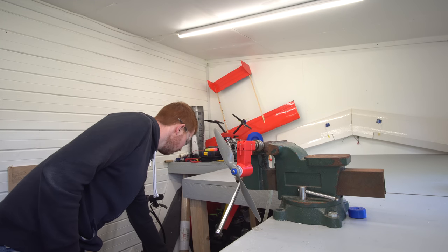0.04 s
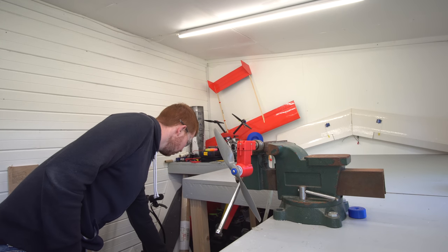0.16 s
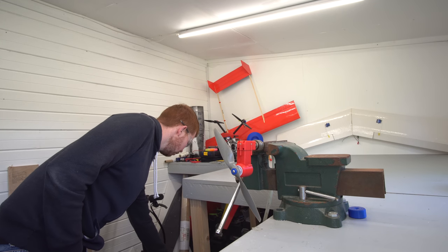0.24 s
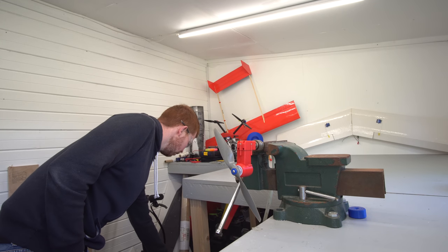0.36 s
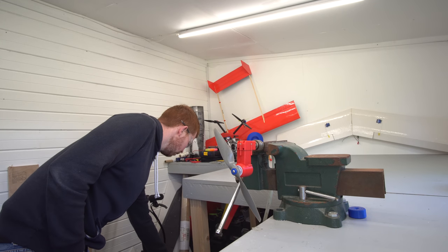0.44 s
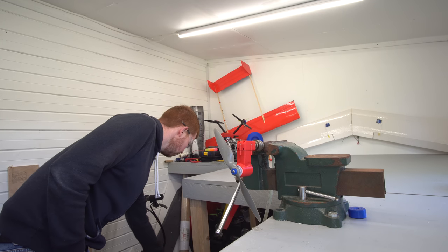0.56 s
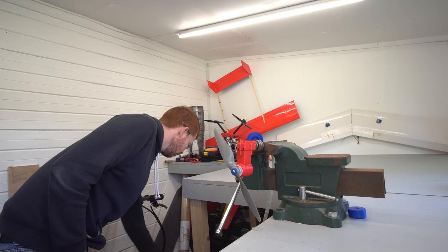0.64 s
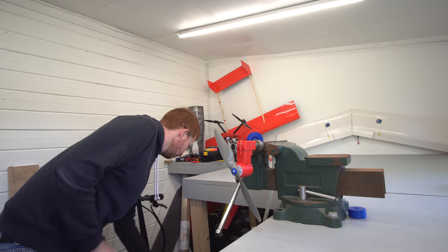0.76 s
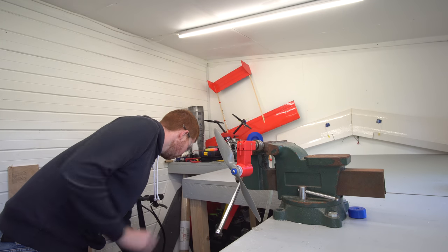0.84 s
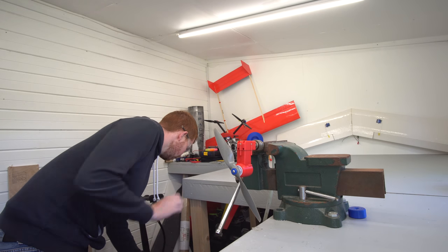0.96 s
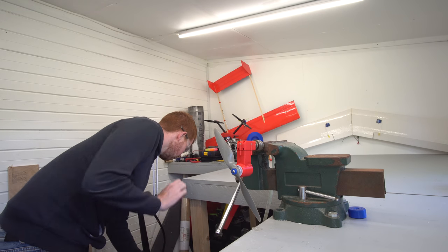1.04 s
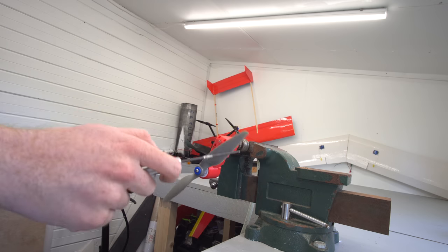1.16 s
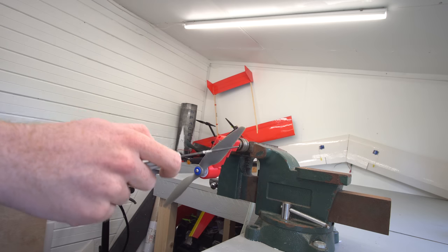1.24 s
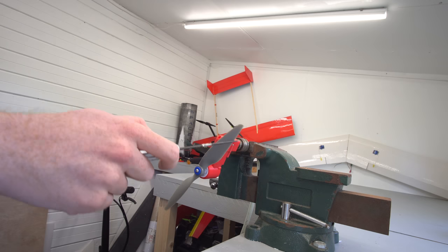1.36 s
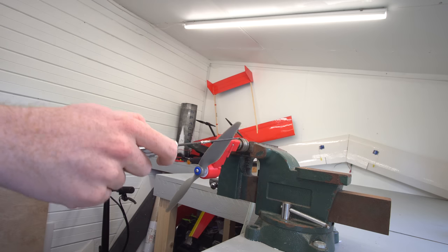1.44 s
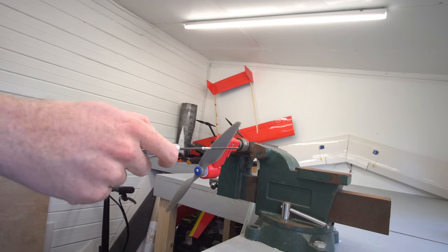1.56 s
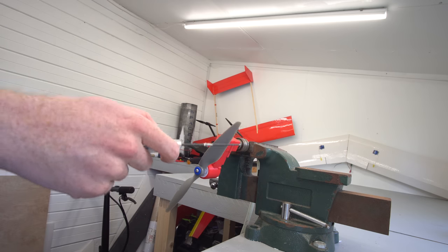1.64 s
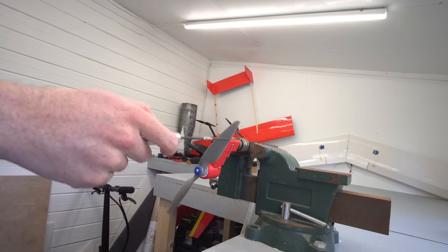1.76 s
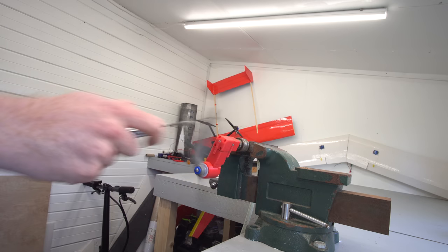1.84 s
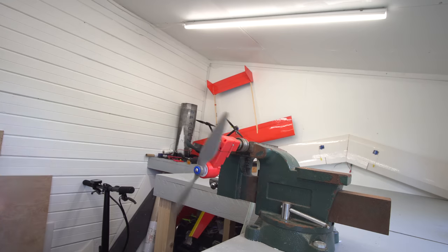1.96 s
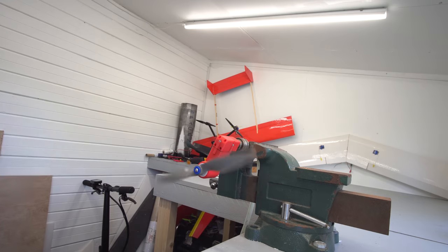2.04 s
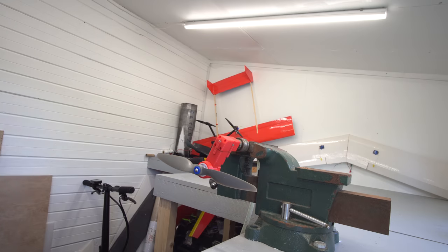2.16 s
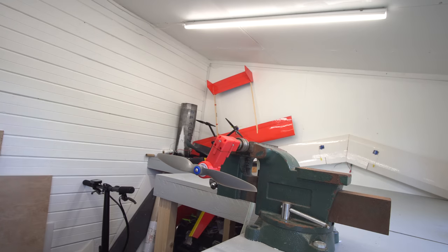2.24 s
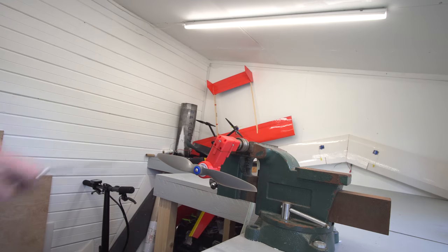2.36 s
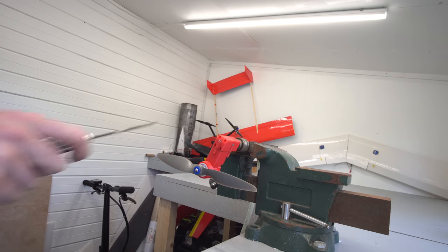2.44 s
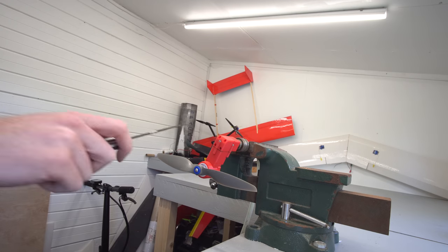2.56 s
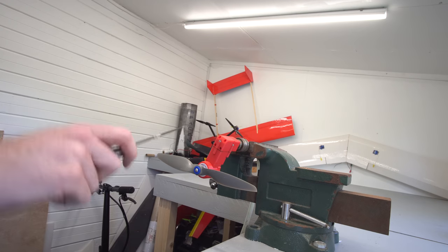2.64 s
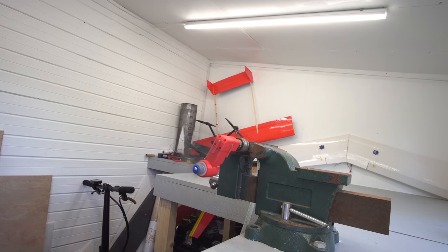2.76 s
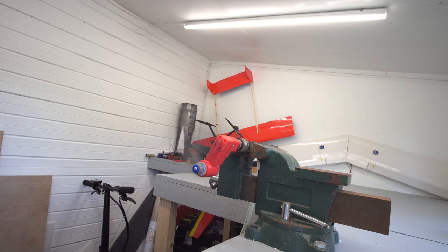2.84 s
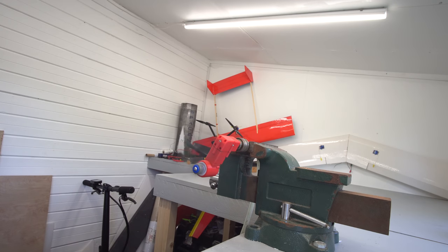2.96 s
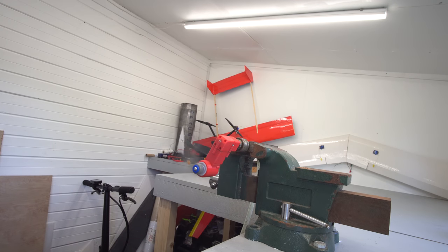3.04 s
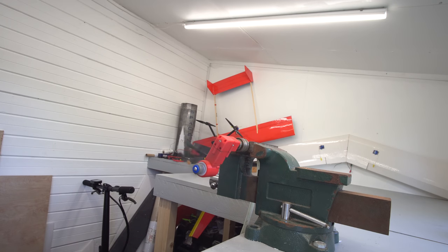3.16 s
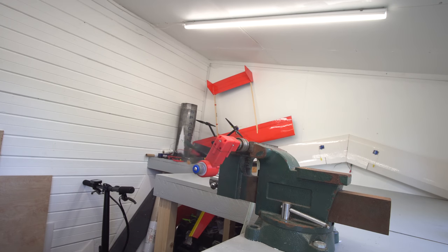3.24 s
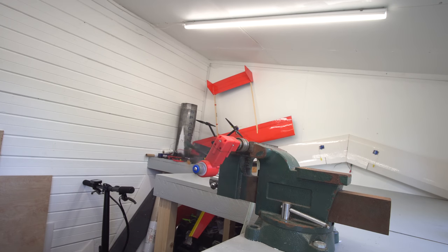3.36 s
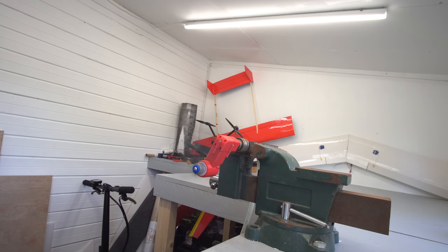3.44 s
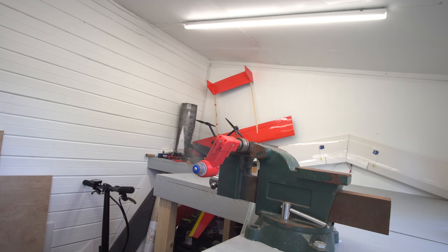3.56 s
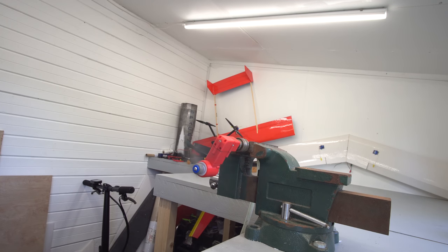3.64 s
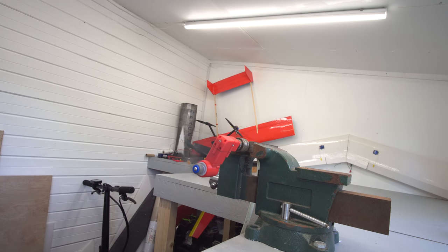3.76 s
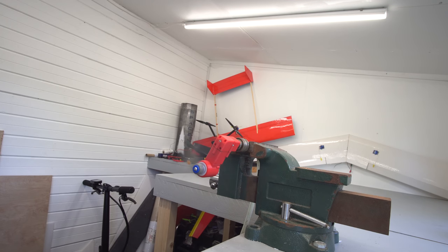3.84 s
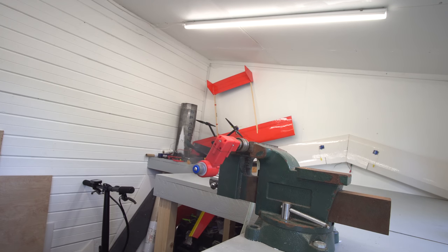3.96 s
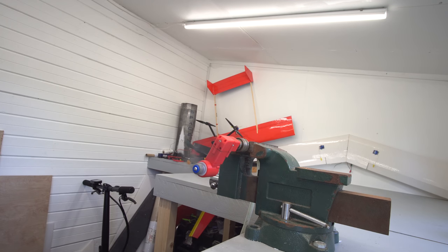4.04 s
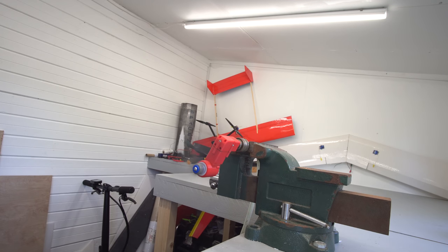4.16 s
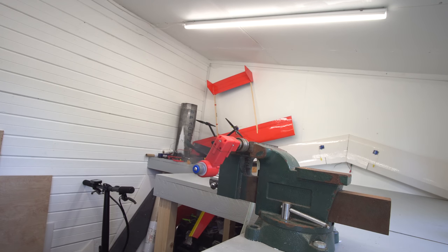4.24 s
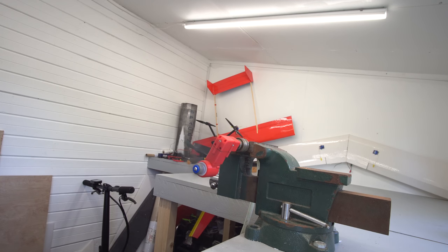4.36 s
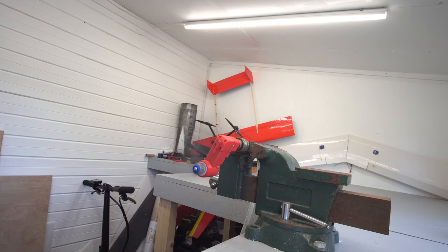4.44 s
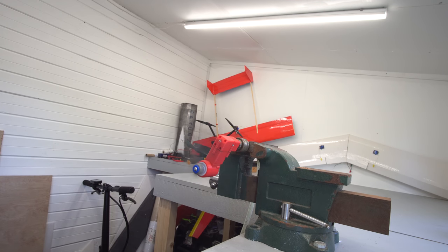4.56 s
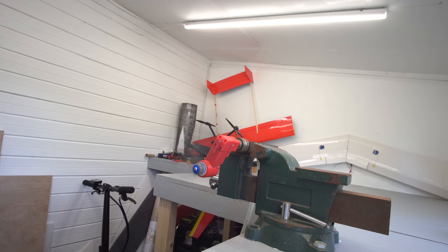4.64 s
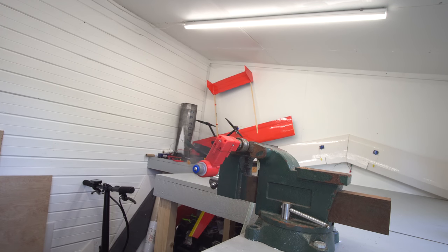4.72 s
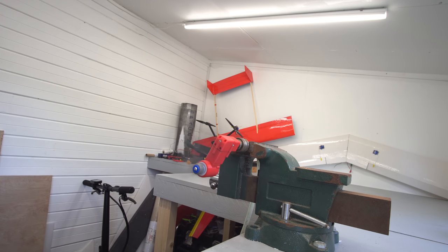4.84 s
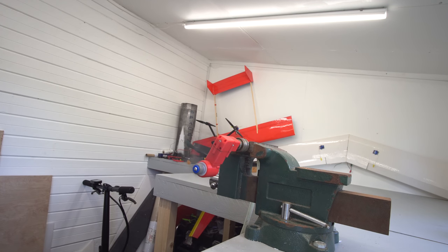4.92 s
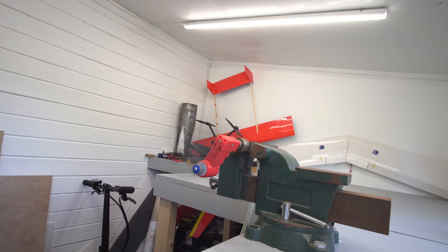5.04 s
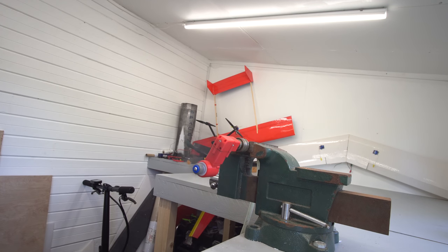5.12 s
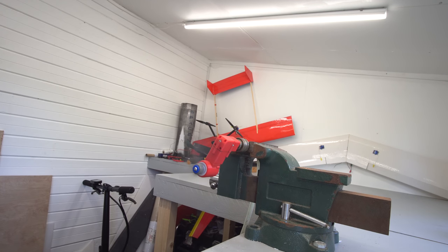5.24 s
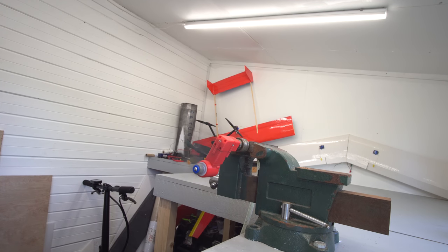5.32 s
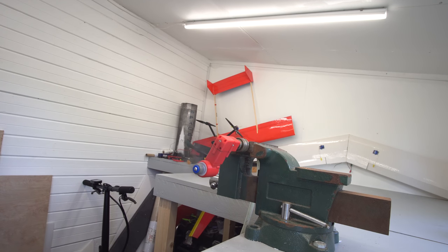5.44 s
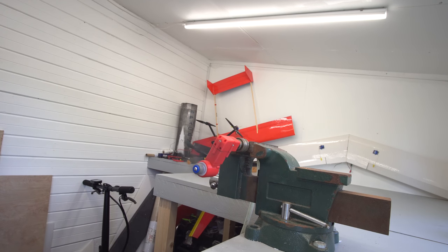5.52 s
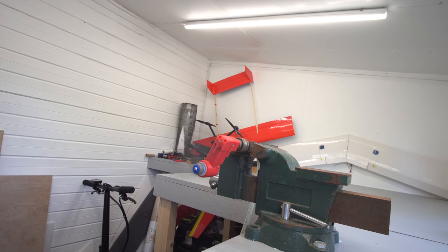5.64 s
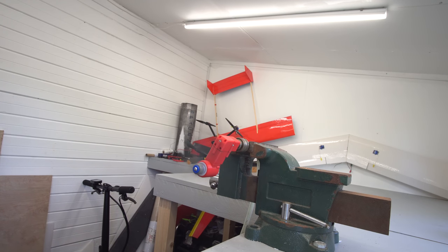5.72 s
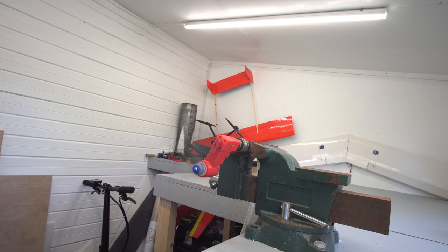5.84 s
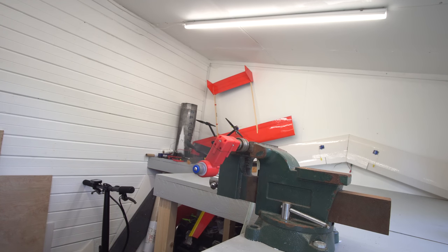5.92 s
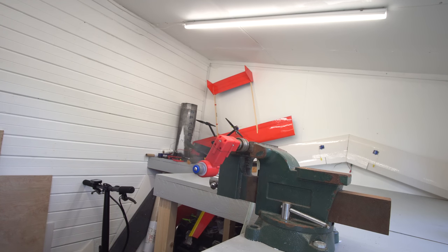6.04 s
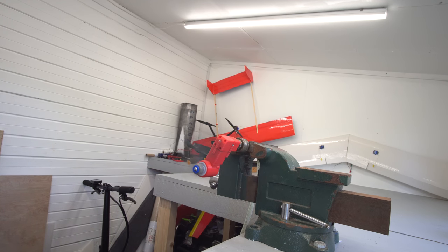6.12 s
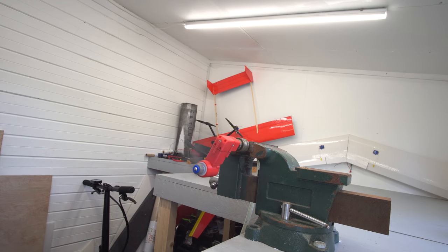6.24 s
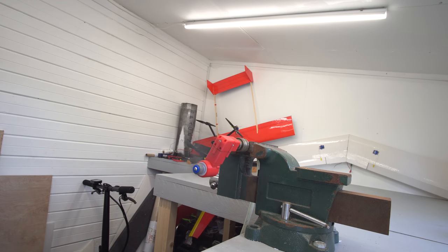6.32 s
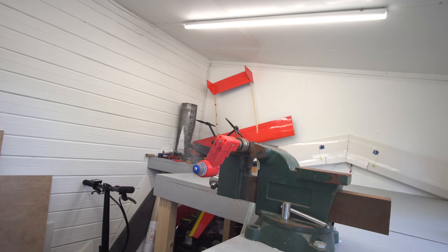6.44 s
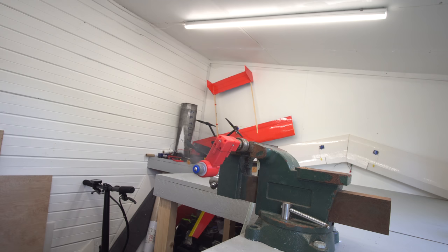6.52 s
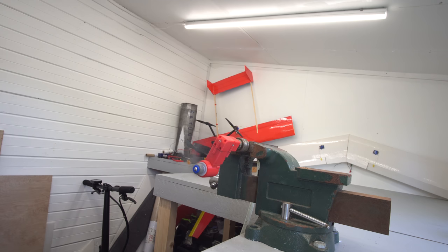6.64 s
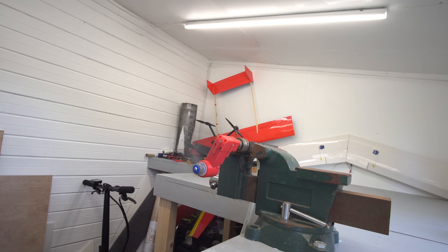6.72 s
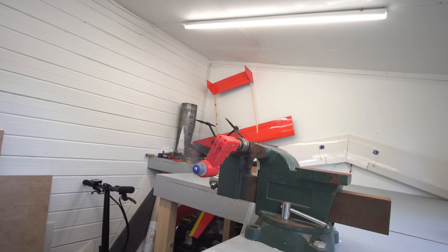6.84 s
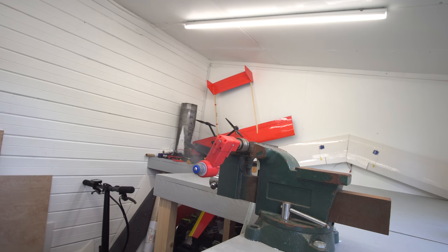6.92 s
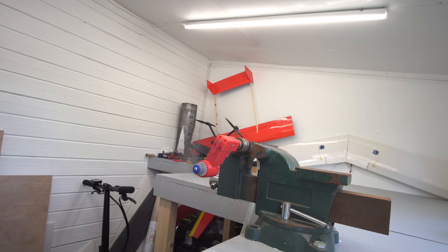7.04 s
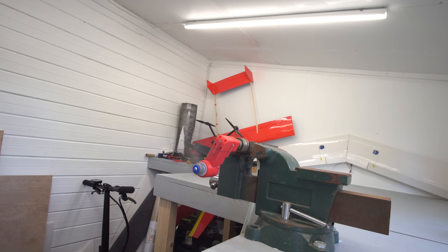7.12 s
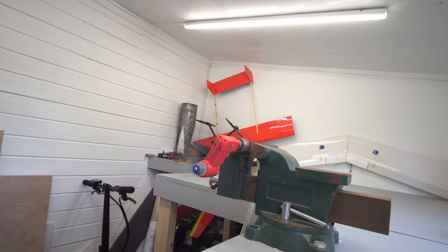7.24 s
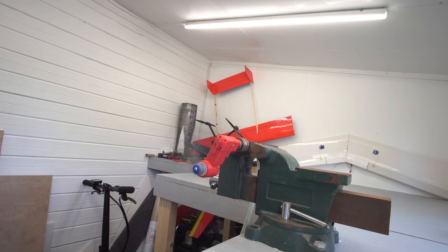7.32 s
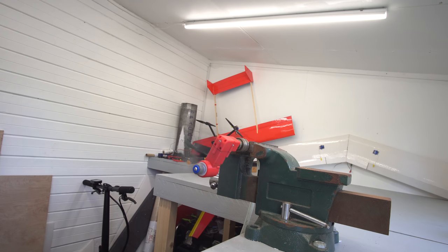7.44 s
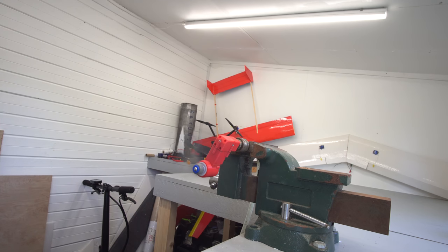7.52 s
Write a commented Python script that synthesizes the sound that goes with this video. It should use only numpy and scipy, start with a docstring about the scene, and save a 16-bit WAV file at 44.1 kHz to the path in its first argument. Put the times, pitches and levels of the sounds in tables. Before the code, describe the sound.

A distant, blurred engine buzz with throbbing hiss ends suddenly. The microphone is now near the engine clamped in a vice: quiet high leaking air, soft touches, a single knock with a puff, leak again, then quick pops as it catches and spins up within a fraction of a second. Rapid hard knocks, low beat and bright pulsing air continue to the end, slowly fading, with short room reflections.

```python
"""A small workshop: a single-cylinder compressed-air engine with a propeller is clamped in a vice.
It runs, heard from across the room; then, from close by, it stands with its valve leaking, is flicked
over for one stroke, and at last starts and runs on while the air pressure slowly falls.
Running sound is periodic in the shaft's angle: harmonics for the pressure pulses, gated noise for the
inlet and exhaust air, damped sines for the knocks. A loose thing clatters during the near run."""
import sys
import numpy as np
from scipy import signal
from scipy.fft import rfft, irfft, next_fast_len
from scipy.io import wavfile

SR = 44100
rng = np.random.default_rng(int(sys.argv[2]) if len(sys.argv) > 2 else 0)


def transcribe(u):
    """Save the signal u as a 16-bit wav file named by the first command-line argument.

    u: samples, shape (n,) or (channels, n), limited to [-1, 1]; the rate is SR.
    q: integer samples, one column per channel.
    """
    v = np.clip(np.atleast_2d(u).T, -1, 1)
    q = np.round(v * 32767).astype(np.int16)
    wavfile.write(sys.argv[1], SR, q)


N = 334278
T = np.arange(N) / SR  # time/s

# In spectra, harmonics and resonances, levels are relative: the sum is scaled to a set power.

# --- near run ---
# full shaft speed, which hunts a little: (t/s, speed/(turns/s))
FULL_SPEED = [(3.59, 42.911), (3.67, 43.707), (4.08, 42.111), (4.36, 43.262), (4.8, 41.955), (5.15, 42.967),
              (5.55, 41.779), (5.65, 42.607), (6.69, 42.705), (7.14, 42.322), (7.58, 42.837)]
# the engine catches at this knock (t/s), short of full speed by a share that dies away (time constant/s)
CATCH_S, SHORTFALL, SPIN_UP_S = 2.8985, .3857, .0774
# the supply holds until t/s, then drains; after DRAIN_S more only the low-pressure beat is left
FULL_UNTIL_S, DRAIN_S = 3.7, 2.6
# levels at full pressure and speed (dB), fall as the supply drains (dB/s), growth with speed (exponent)
BEAT_DB, BEAT_FALL_DB_PER_S, BEAT_GROWTH = -22.5, 1.27, 1
AIR_DB, AIR_FALL_DB_PER_S, AIR_GROWTH = -20.5, 1.23, .95
# the inlet hisses just before the knock (level/dB, lead/turns, width/turns)
INLET_DB, INLET_LEAD, INLET_LENGTH = 6.0, 0.082, 0.056
# the piston chokes the flow at the knock, then spent air spills out and ebbs (level/dB, length/turns)
CHOKE_DB, CHOKE_LENGTH = -3.5, 0.02
SPILL_DB, SPILL_LENGTH = 3.5, 0.087
# pressure pulses of valve, exhaust and return stroke: (angle/turns, signed size)
STROKES = [(-.017, -0.28), (0.228, 0.9), (.58, -.25)]
# harmonics of the beat at full and at lower pressure: (multiple of the shaft speed, level/dB)
FULL_HARMONICS = [(1, -16), (2, 0.5), (3, 1.5), (4, -4.5), (5, -16), (6, -0.5), (7, -6.5), (8, -35),
                  (9, 2.5), (10, -1.5), (11, 1.5), (12, -15), (13, 0.5), (14, 2.5), (15, 1), (16, -5.5),
                  (17, -16), (18, -3), (19, -11), (20, 1.5), (21, -6.5), (22, -29), (23, -12), (24, -53)]
LOWER_HARMONICS = [(1, -32), (2, -6.5), (3, -4.5), (4, -12), (5, -38), (6, -8), (7, -10), (8, -15),
                   (9, -10.5), (10, -8), (11, -9), (12, -7.5), (13, -4), (14, 1), (15, -4.5), (16, -7.5),
                   (17, -13.5), (18, -7), (19, -23), (20, -6.5), (21, -26), (22, -41), (23, -20), (24, -51)]
# hiss of the running engine: (f/Hz, level/dB)
NEAR_AIR = [(530, -16.5), (900, -3.5), (1230, -8.5), (1390, -3), (1720, -3.5), (2600, -6), (3550, -7.5),
            (4740, -7), (6890, -7), (8550, 1), (10200, -12.5), (13500, -6.5), (16000, -21)]
# rush of spent air, which grows with the pressure: (f/Hz, level/dB)
RUSH_AIR = [(100, -56), (400, 8), (900, 0), (1500, -3), (2300, 4.5), (3500, -5), (6000, -2.5), (12000, -8)]
# crack of air through the valve: (f/Hz, level/dB)
CRACK_AIR = [(300, -8), (900, -38), (1800, -34), (2800, -7), (5000, -8), (8400, 7.5), (10300, -6),
             (13500, 5), (16000, -13)]
# modes of the crankcase: (f/Hz, t60/s, level/dB)
CASE_MODES = [(1266, 0.013, -13), (1770, 0.027, -9.5), (1940, 0.0095, -5.5), (2156, 0.014, -10.5),
              (2770, 0.004, -4), (3650, 0.0052, -5)]

# --- single strokes ---
# single knocks of the valve: (t/s, crack level/dB, rise/s, crankcase blow level/dB)
KNOCKS = [(1.9988, -7.5, 0.00077, -14), (2.8096, -19, 0.00091, -10.5)]
# pops of the exhaust and soft thuds of the hand: (t/s, level/dB, f/Hz, Gaussian width/s)
POPS = [(1.982, -13, 425, 0.0016), (1.987, -31, 106, 0.017), (2.108, -36, 247, 0.0015),
        (2.188, -50, 45, .03), (2.866, -9.5, 540, 0.00093), (2.908, -9.5, 545, 0.00093)]
# gusts of air while the shaft turns slowly: (peak t/s, level/dB, rise/s, decay/s)
GUSTS = [(1.971, -21, 0.005, 0.023), (2.012, -16, 0.006, 0.033), (2.811, -19, 0.0012, 0.0055),
         (2.854, -22, 0.0023, 0.014)]
# each gust trails off as the pipe empties (share of its strength, decay/s)
TRAIL_SHARE, TRAIL_S = 0.32, .05
# air of the gusts: (f/Hz, level/dB)
GUST_AIR = [(60, 7), (200, -5), (650, -0.5), (1300, -1.5), (2400, -4.5), (4200, -0.5), (6400, -4),
            (7500, -1.5), (9000, 0.5), (10300, -7.5), (13500, -7), (16000, -15)]
# whistling resonances of the open port: (f/Hz, width/Hz, boost/dB)
PORT_PEAKS = [(710, 140, 5), (2170, 260, 7), (6150, 390, 8), (8840, 460, 7)]

# --- far run ---
# shaft speed (turns/s), start of a turn and end of the run (t/s)
FAR_HZ, FAR_FIRST_S, FAR_END_S = 47.83, .0286, 1.179
# levels at the start (dB) and their fall as the supply drains (dB/s)
FAR_DRONE_DB, FAR_HISS_DB, FAR_FALL_DB_PER_S = -18.5, -19.2, 1.85
# the strokes and their echoes from the walls: (angle/turns, signed size)
FAR_STROKES = [(-.27, 0.89), (-.04, -0.58), (0.199, 1), (0.367, -0.53), (0.549, 0.058)]
# harmonics of the drone: (multiple of the shaft speed, level/dB)
FAR_HARMONICS = [(1, -2.5), (2, -1.5), (3, -3.5), (4, -25.5), (5, -3.5), (6, -10), (7, 2.5), (8, -6.5),
                 (9, 0), (10, -5), (11, -3.5), (12, -1), (13, -25), (14, 1), (15, -3.5), (16, 0.5), (17, 1),
                 (18, -6), (19, -5), (20, -9.5), (21, -5), (22, -19.5), (23, -33), (24, -23.5), (25, -17),
                 (26, -12.5), (27, -23.5), (28, -5), (29, -16), (30, -17), (31, -8), (32, -22)]
# hiss across the room: (f/Hz, level/dB)
FAR_AIR = [(300, -13), (800, -2), (1200, -6), (2000, -7.5), (3000, -8.5), (4200, -1.5), (6800, -6),
           (8500, -11.5), (10500, -20), (12500, -17), (16000, -26)]
# knocks across the room: (f/Hz, level/dB)
FAR_KNOCK = [(1200, -37), (1550, -4), (1950, -3.5), (2300, -5), (2800, -6), (4200, -9), (7000, -10),
             (12000, -29)]
# resonances in the far hiss and knocks: (f/Hz, width/Hz, boost/dB)
FAR_PEAKS = [(1961, 19, 9.5), (2300, 28, 5), (3540, 170, 7.5), (4270, 120, 7), (5605, 68, 3),
             (6890, 260, 4), (9150, 130, 8)]

# --- clatter ---
# blows of something loose: (t/s, envelope level/dB, centre f/Hz)
CLATTER = [(4.7819, -9, 2350), (4.7935, -9.5, 1494), (4.7948, -15, 2100), (4.807, -12, 1400),
           (4.853, -14, 1090), (4.879, -13, 1820)]
# its scraping between the blows: (start t/s, end t/s, level/dB)
SCRAPE = (4.79, 4.95, -27.5)
# spectrum of the scraping: (f/Hz, level/dB)
SCRAPE_SPECTRUM = [(400, -30), (800, -5), (1400, 1), (2200, -2), (3200, -12), (6000, -35)]

# --- standing engine and room ---
# the leak before and after the first single knock lets air out (level/dB)
LEAK_DB, LEAK_AFTER_DB = -38.4, -40
# leaking air: (f/Hz, level/dB)
LEAK_AIR = [(760, -59), (1300, -34), (1880, -21.5), (2390, -9), (2980, -19), (4350, -22), (5660, -9.5),
            (6690, -13), (7050, -5.5), (7920, 3), (9660, -11.5), (11000, -4), (12800, -7.5), (15200, -6),
            (16000, -20)]
# soft rubs of hand and tool at the propeller: (t/s, level/dB, standard deviation/s)
RUBS = [(1.416, -59.5, 0.031), (1.602, -49.5, 0.016), (1.795, -51.5, 0.0087), (1.94, -48.5, 0.022)]
# rubbing noise: (f/Hz, level/dB)
RUB_SPECTRUM = [(150, -5), (450, -8), (860, -10), (1600, -12), (5000, -16), (12000, -28)]
# resonances under the rubbing: (f/Hz, width/Hz, boost/dB)
RUB_PEAKS = [(640, 70, 8), (880, 110, 14), (1210, 73, 12), (2080, 90, 14)]
# steady background noise: (f/Hz, level/dB)
FLOOR_SPECTRUM = [(20, 0.5), (70, 3.5), (150, -7), (350, -8.5), (700, -19), (1500, -20.5), (4000, -33.5)]
# early reflections from bench, vice and ceiling: (delay/s, signed gain)
REFLECTIONS = [(.0009, 0.029), (.0023, -0.2), (.0037, 0.1), (.0058, 0.077), (.0081, -0.14), (0.0113, .2)]
# reverberation time of the room: (f/Hz, t60/s)
ROOM_T60 = [(100, 0.38), (600, 0.47), (2500, 0.21), (8000, 0.066), (16000, 0.024)]


def near_run(air_db=-1, rush_db=-6, wet_db=-10):
    """Periodic modulation: beat, knock and hiss follow the shaft's angle, its speed and the supply."""
    spin, turns = shaft()
    draining = np.maximum(T - FULL_UNTIL_S, 0)
    pressure = np.clip(1 - draining / DRAIN_S, 0, 1)
    force = amp(AIR_DB - AIR_FALL_DB_PER_S * draining) * spin ** AIR_GROWTH * between(2.888, np.inf)
    air = reflected(amp(air_db) * noise(NEAR_AIR) + amp(rush_db) * pressure * noise(RUSH_AIR))
    air = air * force * amp(flow(turns) + 1.0 * waver(250))
    knock = valve(turns, force)
    beat_gain = amp(BEAT_DB - BEAT_FALL_DB_PER_S * draining) * spin ** BEAT_GROWTH
    beat = exhaust(turns, pressure) * beat_gain
    return air + knock + beat + amp(wet_db) * room(knock)


def shaft():
    """Angle is the integral of speed: share of full speed, and turns from the knock at which it catches."""
    spin = 1 - SHORTFALL * np.exp(-np.maximum(T - CATCH_S, 0) / SPIN_UP_S)
    turns = np.cumsum(curve(FULL_SPEED) * spin) / SR
    return spin, turns - np.interp(CATCH_S, T, turns)


def exhaust(turns, pressure, rough=0.067):
    """Harmonic synthesis: valve and exhaust pulses make the low beat, fuller at high pressure."""
    full = orders(turns, FULL_HARMONICS, STROKES)
    lower = orders(turns, LOWER_HARMONICS, STROKES)
    beat = pressure * full + (1 - pressure) * lower
    return beat * (1 + rough * waver(110)) * between(2.915, np.inf)


def valve(turns, force, crack_db=11.0, rise=0.00052, uneven_db=0.25, ring_db=9, return_at=.49, return_db=-10):
    """Impact excitation: the piston knocks the valve open, and taps faintly at the stroke's far end."""
    strength = force * amp(uneven_db * waver(43))
    blows = strength * clicks(turns)
    returns = strength * clicks(turns - return_at) * amp(return_db)
    envelope = puff(np.arange(SR // 25) / SR, rise)
    crack = signal.oaconvolve(blows, envelope)[:N] * jet()
    return amp(crack_db) * crack + amp(ring_db) * crankcase(blows + returns)


def crankcase(blows):
    """Modal synthesis: blows excite damped modes of the plastic crankcase."""
    t = np.arange(SR // 25) / SR
    ring = 0
    for hz, t60, db in CASE_MODES:
        decay = np.exp(-np.log(1000) * t / t60)
        ring = ring + amp(db) * decay * np.sin(2 * np.pi * hz * t)
    return signal.oaconvolve(blows, ring)[:N]


def jet():
    """Jet noise: bright noise of air cracking through the valve, its peaks evened by saturation."""
    return unit(np.tanh(noise(CRACK_AIR)))


def flow(turns, base_db=-1.5):
    """Gating of flow noise by the ports: level/dB through a turn of inlet hiss, choke and spill."""
    from_knock = (turns + .5) % 1 - .5
    inlet = INLET_DB * bell(from_knock + INLET_LEAD, INLET_LENGTH)
    choke = CHOKE_DB * bell(from_knock, CHOKE_LENGTH)
    spill = SPILL_DB * puff(turns % 1, SPILL_LENGTH)
    return base_db + inlet + choke + spill


def single_strokes(wet_db=-11, pop_wet_db=-20):
    """Transient release: turned by hand, the engine lets its hiss, pop and knock out one by one."""
    air = reflected(colour(rng.standard_normal(N), GUST_AIR, PORT_PEAKS))
    air = air * sum(gust(*row) for row in GUSTS)
    blows, cracks, pops = np.zeros((3, N))
    for s, db, rise, ring_db in KNOCKS:
        blows += amp(ring_db) * signal.unit_impulse(N, round(s * SR))
        cracks += amp(db) * puff(T - s, rise)
    for s, db, hz, length in POPS:
        pops += amp(db) * bell(T - s, length) * np.cos(2 * np.pi * hz * (T - s))
    knocks = crankcase(blows) + jet() * cracks
    return air + knocks + pops + room(amp(wet_db) * knocks + amp(pop_wet_db) * pops)


def gust(s, db, rise, decay):
    """Exponential discharge: a quick swell, a decay and a fainter trail shape one gust."""
    after = np.maximum(T - s, 0)
    fall = (1 - TRAIL_SHARE) * np.exp(-after / decay) + TRAIL_SHARE * np.exp(-after / TRAIL_S)
    return amp(db) * bell(np.minimum(T - s, 0), rise) * fall


def far_run(rough=0.074, air_db=-0.43, knock_db=-5, throb_db=1.2):
    """Superposed echoes: across the room the strokes smear into a drone under a gently throbbing hiss."""
    turns = FAR_HZ * (T - FAR_FIRST_S) + .004 * waver(12)
    drone = orders(turns, FAR_HARMONICS, FAR_STROKES) * (1 + rough * waver(68.8))
    echoed = room(clicks(turns) * amp(1.4 * waver(48.6)))
    knocks = unit(colour(echoed, FAR_KNOCK, FAR_PEAKS))
    air = reflected(colour(rng.standard_normal(N), FAR_AIR, FAR_PEAKS))
    air = air * amp(air_db + throb_db * np.cos(2 * np.pi * turns))
    sound = amp(FAR_DRONE_DB) * drone + amp(FAR_HISS_DB) * (air + amp(knock_db) * knocks)
    return sound * amp(-FAR_FALL_DB_PER_S * T) * between(-1, FAR_END_S)


def clatter(rise=0.00097, spread=1.4, ring_db=-8, scuff_db=-3, wet_db=-5):
    """Impact and friction: a loose thing bounces in short, hollow clacks and scrapes between them."""
    start, end, scrape_db = SCRAPE
    out = amp(scrape_db) * noise(SCRAPE_SPECTRUM) * between(start, end, fade=0.017)
    for s, db, hz in CLATTER:
        band = signal.butter(2, [hz / spread, hz * spread], "bandpass", fs=SR, output="sos")
        scuff = unit(signal.sosfilt(band, rng.standard_normal(N)))
        ring = np.sin(2 * np.pi * hz * (T - s))
        out += amp(db) * puff(T - s, rise) * (amp(scuff_db) * scuff + amp(ring_db) * ring)
    return out + amp(wet_db) * room(out)


def standing(floor_db=-58, wet_db=-7):
    """Turbulence and friction: air leaks past the shut valve, a hand rubs, and a faint noise floor stays."""
    leak_db = np.where(T < KNOCKS[0][0], LEAK_DB, LEAK_AFTER_DB)
    leak = noise(LEAK_AIR) * amp(leak_db + 0.38 * waver(41.2)) * between(FAR_END_S, 2.83)
    pressing = sum(amp(db) * np.exp(-((T - s) / length) ** 2 / 2) for s, db, length in RUBS)
    rubs = pressing * colour(rng.standard_normal(N), RUB_SPECTRUM, RUB_PEAKS)
    return leak + rubs + amp(wet_db) * room(rubs) + amp(floor_db) * noise(FLOOR_SPECTRUM)


def reflected(x):
    """Comb filtering: adds the first reflections, scaled to keep about the same power."""
    echoes = sum(gain * np.interp(T - delay, T, x, left=0) for delay, gain in REFLECTIONS)
    return (x + echoes) / np.sqrt(1 + sum(gain ** 2 for delay, gain in REFLECTIONS))


def room(x):
    """Diffuse reverberation of the boarded walls, of energy 1, each band decaying at its own rate."""
    taps = rng.standard_normal(SR // 2) * (np.arange(SR // 2) > SR // 250)  # silent for the first 4 ms
    hz, t, bands = signal.stft(taps, SR, nperseg=256)
    decay = np.exp(-np.log(1000) * t / read(ROOM_T60, hz)[:, None])
    tail = signal.istft(bands * decay, SR, nperseg=256)[1]
    return signal.oaconvolve(x, tail / np.linalg.norm(tail))[:N]


def orders(turns, table, strokes):
    """Fourier series: a wave of rms 1 repeats each turn, its phases gathering energy at the strokes."""
    grid = np.linspace(0, 1, 1024)
    wave = 0
    for k, db in table:
        pulses = sum(1j * size * np.exp(-2j * np.pi * k * at) for at, size in strokes)
        wave = wave + amp(db) * np.cos(2 * np.pi * k * grid + np.angle(pulses))
    return np.interp(turns % 1, grid, unit(wave))


def clicks(turns):
    """Impulse train: one unit click at the start of each turn."""
    return np.diff(np.floor(turns), prepend=np.floor(turns[0]))


def colour(x, points, peaks=()):
    """Linear filtering: gives x a spectrum with resonances on top; white noise keeps its power."""
    size = next_fast_len(N + SR // 10)
    hz = np.fft.rfftfreq(size, 1 / SR)
    db = read(points, hz)
    for f, width, boost in peaks:
        db = db + boost / (1 + (2 * (hz - f) / width) ** 2)
    return irfft(rfft(x, size) * unit(amp(db)), size)[:N]


def noise(points):
    """Filtered noise: random noise of about rms 1 with the given spectrum."""
    return colour(rng.standard_normal(N), points)


def waver(rate):
    """Random modulation: a slow chance signal with so many new values a second."""
    values = rng.standard_normal(N // 20)
    return unit(np.interp(T * rate, np.arange(N // 20), values))


def puff(t, rise):
    """Attack and decay: an envelope swells to 1 in the rise time and dies away."""
    u = np.maximum(t / rise, 0)
    return u * np.exp(1 - u)


def bell(x, width):
    """Gaussian pulse: a smooth hump of height 1 around x = 0."""
    return np.exp(-(x / width) ** 2)


def between(start, end, fade=0.0055):
    """Gating: 1 from start to end, with short linear fades."""
    return np.clip((T - start) / fade, 0, 1) * np.clip((end - T) / fade, 0, 1)


def curve(rows):
    """Linear interpolation: a timed table at every sample."""
    return np.interp(T, *np.transpose(rows))


def read(points, hz):
    """Logarithmic interpolation: a spectrum table on a log-frequency axis."""
    f, value = np.transpose(points)
    return np.interp(np.log(hz + 1), np.log(f), value)


def amp(db):
    """Logarithmic level: decibels to gain."""
    return 10 ** (np.asarray(db) / 20)


def unit(x):
    """Normalisation: scales to rms 1."""
    return x / np.sqrt(np.mean(x ** 2) + 1e-20)


def scene():
    """Superposition: all sources add at one point, alike in both channels."""
    mono = near_run() + single_strokes() + far_run() + clatter() + standing()
    return np.array([mono, mono])


def record(dry):
    """Band limiting and saturation: cuts deepest rumble and top treble, and rounds the highest peaks."""
    sound = signal.sosfilt(signal.butter(1, 12, "highpass", fs=SR, output="sos"), dry)
    sound = sound / (1 + (sound / .9) ** 6) ** (1 / 6)
    lowpass = signal.firwin(511, 15900, window=("kaiser", 9), fs=SR)  # cutoff/Hz
    return signal.oaconvolve(sound, lowpass[None], "same")


dry = scene()
out = record(dry)
transcribe(out)
```